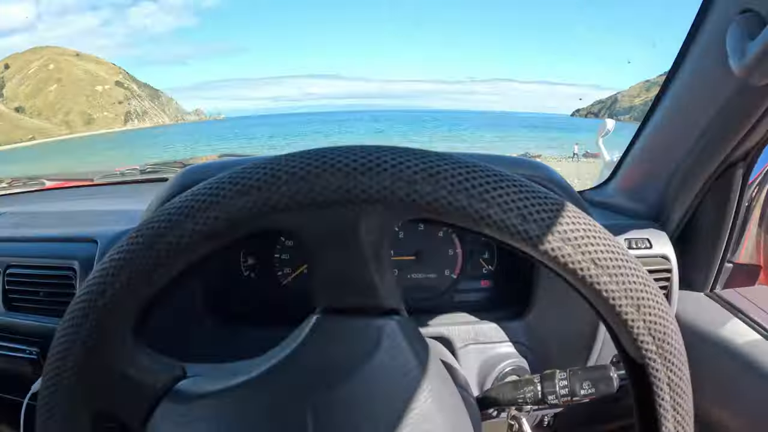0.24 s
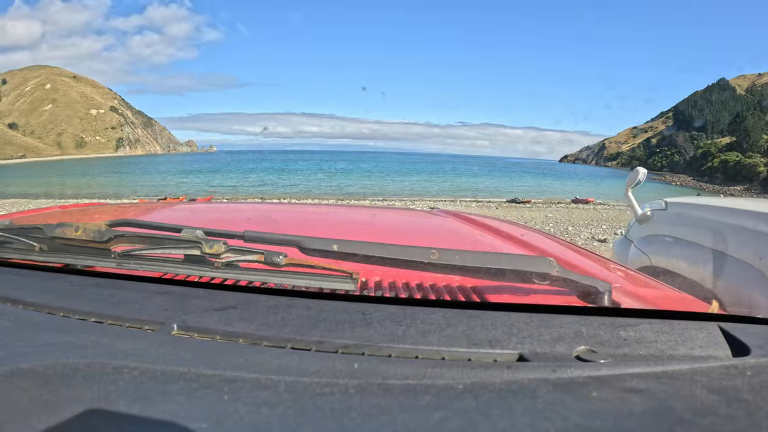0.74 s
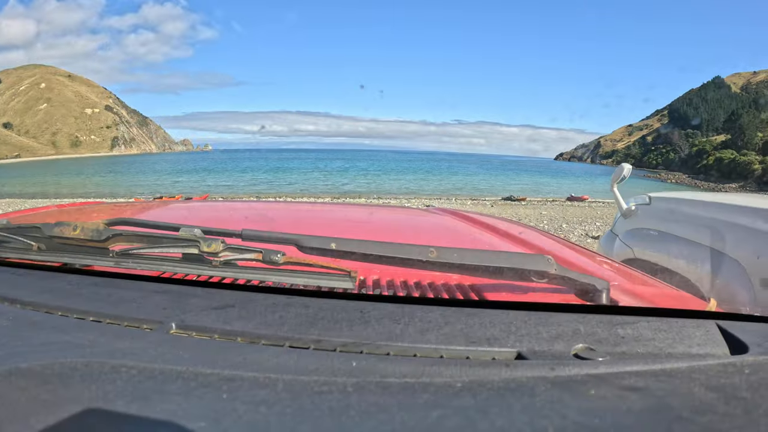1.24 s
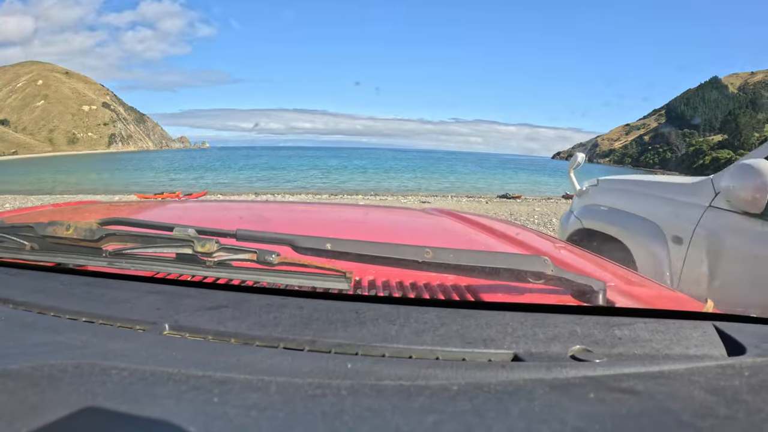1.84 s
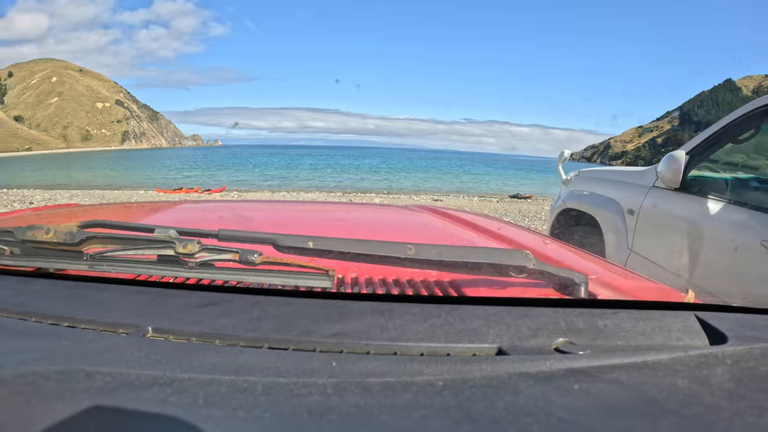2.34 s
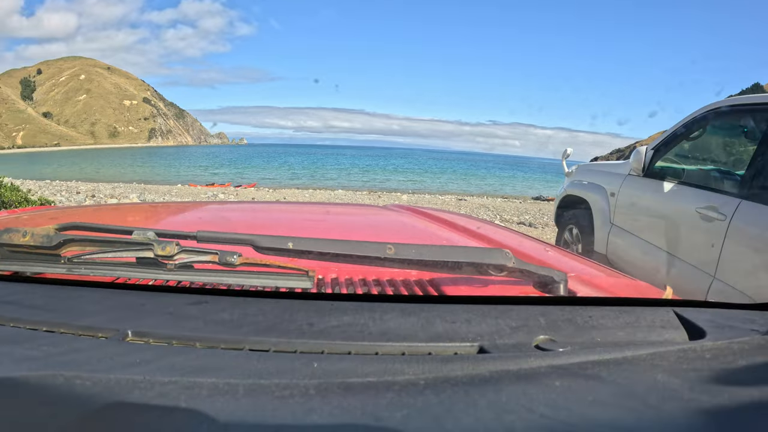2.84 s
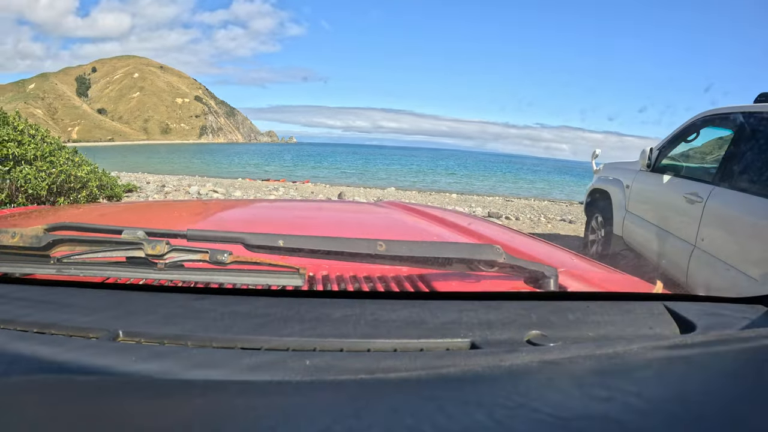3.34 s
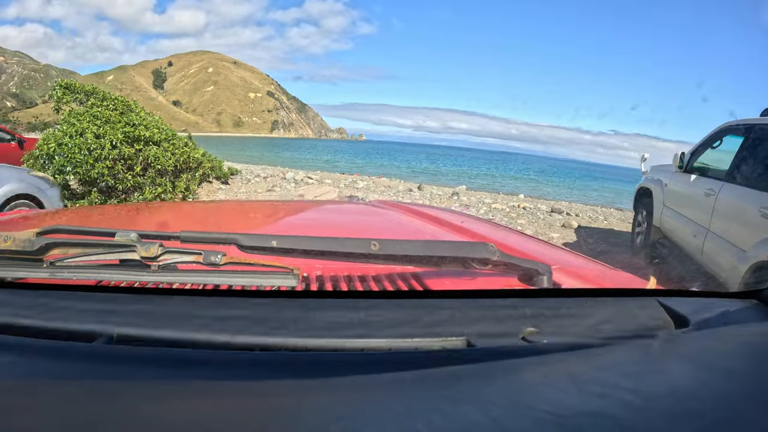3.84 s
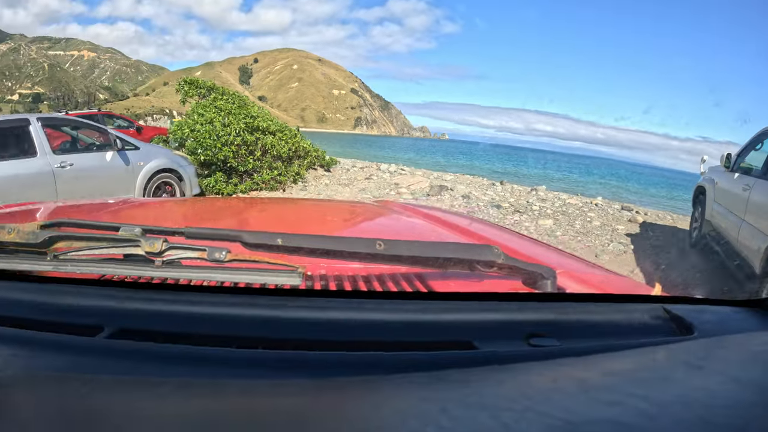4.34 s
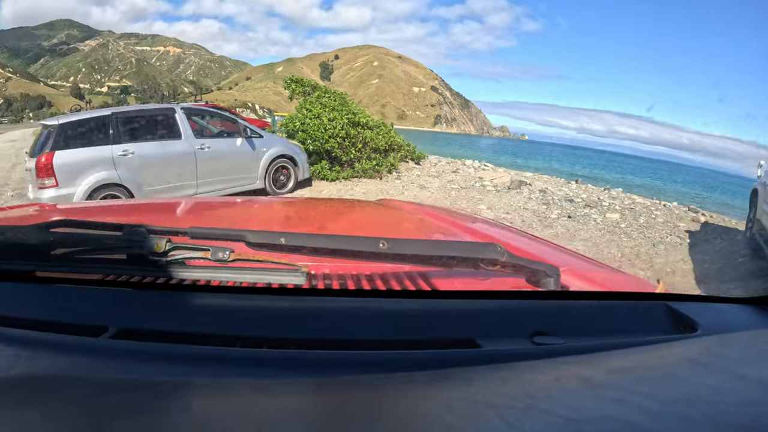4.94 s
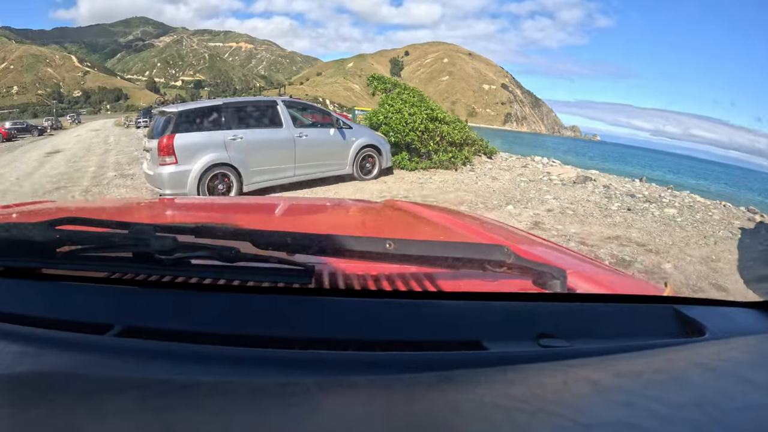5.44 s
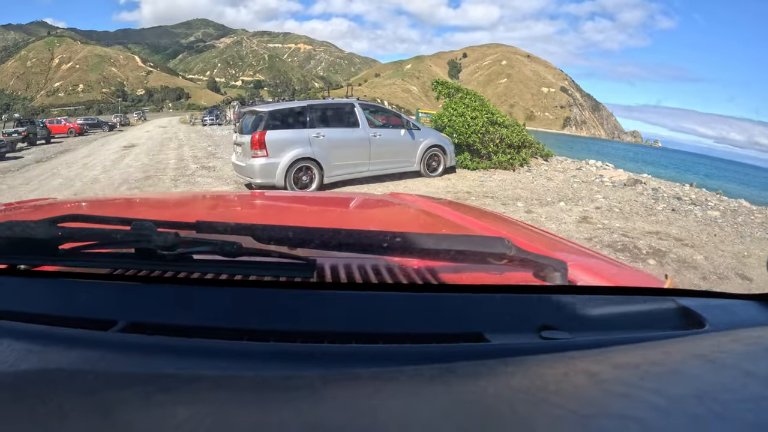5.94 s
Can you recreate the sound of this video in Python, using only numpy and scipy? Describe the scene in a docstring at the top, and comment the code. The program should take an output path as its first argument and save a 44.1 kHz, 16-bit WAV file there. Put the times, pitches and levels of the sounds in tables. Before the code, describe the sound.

Steady diesel idling heard in the cabin, then two quick hard plastic knocks as the microphone settles on the dashboard. From there the engine is heard through the panel, humming and rattling evenly. Tyres roll slowly over stones with soft thumps and crunches, hands slide over a textured steering wheel, plastic creaks briefly, and irregular trim knocks and small metallic clicks grow denser late on.

```python
"""A diesel idle booms in the cabin air of a four-wheel drive, then a few knocks as a camera meets the dashboard.
From there the panel carries hum and clatter, while the car backs slowly out over a stony beach car park.
Engine sounds are cosines and noise bursts locked to the firings; tyres are shaped noise and stone grains.
Palms are shaped noise on the wheel; trim, camera and keys are struck modes; squeaks are fuzzy glides."""
import sys
import numpy as np
from scipy import signal
from scipy.fft import rfft, irfft
from scipy.io import wavfile
from scipy.ndimage import uniform_filter1d

SR = 44100
rng = np.random.default_rng(int(sys.argv[2]) if len(sys.argv) > 2 else 0)


def generate_wav(signal):
    """Clip the signal to [-1, 1] and save it as 16-bit WAV at the path in sys.argv[1]."""
    frames = np.transpose(np.atleast_2d(signal))
    scaled = np.clip(frames, -1, 1) * 32767
    pcm = np.round(scaled).astype(np.int16)
    wavfile.write(sys.argv[1], SR, pcm)


N = 273420
TIME = np.arange(N) / SR
CONTACT_S = 0.672  # camera meets dashboard
EDGE_HZ = 15800  # upper band limit


def gain_of(db):
    """Decibels to amplitude factor."""
    return 10 ** (np.asarray(db) / 20)


def evened(x):
    """Scales to rms 1."""
    return x / np.sqrt(np.mean(x ** 2) + 1e-20)


def curve(rows):
    """Value column of a (time, value) table, joined by straight lines over the whole time."""
    rows = np.array(rows)
    return np.interp(TIME, rows[:, 0], rows[:, 1])


def coloured(x, spectrum):
    """Filters x by a gain curve, linear in dB over log frequency; rms 1."""
    hz, db = np.transpose(spectrum)
    f_hz = np.fft.rfftfreq(len(x), 1 / SR)
    gain = gain_of(np.interp(np.log(f_hz + 1), np.log(hz), db))
    return evened(irfft(rfft(x) * gain, len(x)))


def band(x, low_hz, high_hz):
    """Causal band-pass."""
    sos = signal.butter(4, [low_hz, high_hz], "band", fs=SR, output="sos")
    return signal.sosfilt(sos, x)


def wander(rate_hz):
    """Slow noise of rms 1, its spectrum falling as a Gaussian of scale rate_hz."""
    f_hz = np.fft.rfftfreq(N, 1 / SR)
    spectrum = rfft(rng.standard_normal(N)) * np.exp(-(f_hz / rate_hz) ** 2)
    return evened(irfft(spectrum, N))


def add(mix, start_s, sound):
    """Mixes a sound in at start_s."""
    part = mix[max(round(start_s * SR), 0):][:len(sound)]
    part += sound[:len(part)]


def strike(sound, window_samples=176):
    """Scales a hit so that its loudest window (4 ms by default) has rms 1."""
    return sound / np.sqrt(uniform_filter1d(sound ** 2, window_samples).max())


def ring(modes, t, spread):
    """Decaying sine modes, one a row, with random signs and random detuning by spread."""
    hz, db, t60_s = np.transpose(modes)[:, :, None]
    detune, sign = rng.standard_normal((2, len(modes), 1))
    decay = gain_of(db - 60 * t / t60_s)
    return np.sign(sign) * decay * np.sin(2 * np.pi * hz * (1 + spread * detune) * t)


def bursts(turns, decay_turns, scatter_db, steady):
    """Noise that flares at every whole turn and decays, each flare of its own size, over a steady part."""
    size = gain_of(scatter_db * rng.standard_normal(N))[np.floor(turns).astype(int)]
    flare = size * np.exp(-(turns % 1) / decay_turns)
    return (steady + flare) * rng.standard_normal(N)


# engine speed: time_s, speed_rpm
SPEED_RPM = [(0, 756), (0.9, 760), (1.25, 746), (3.3, 750), (4.4, 755), (4.95, 761), (5.28, 794),
             (5.65, 752), (6.2, 762)]


def firings():
    """Running count of firings: four cylinders fire twice a revolution."""
    firing_hz = 2 * curve(SPEED_RPM) / 60
    return np.cumsum(firing_hz) / SR


# idle boom in the cabin air: firing_rate_multiple, relative_level_db
AIR_ORDERS = [(1, 2.5), (2, -14.5), (3, -11.5), (4, -16), (5, -18), (6, -21), (7, -26), (8, -42), (9, -22),
              (11, -29.5), (14, -41)]
# wash in the cabin air: frequency_hz, relative_level_db
WASH_SPECTRUM = [(20, -32), (60, 6), (200, 2), (350, -9), (600, -17.5), (1200, -24), (2500, -32),
                 (4500, -37.5), (9000, -47.5), (15000, -61)]
# tick at each firing: frequency_hz, relative_level_db
TICK_SPECTRUM = [(1500, -31), (3500, -1), (4400, 4), (5500, -11), (6400, 3), (7400, -7), (9000, -3),
                 (11000, -22), (15000, -24)]


def cabin_air(turns, wash_db=-41.5, tick_db=-71.5):
    """Air-borne idle: a boom of firing orders, a soft noise wash and a fine tick at each firing."""
    boom = np.zeros(N)
    for k, db in AIR_ORDERS:
        boom += gain_of(db) * np.cos(2 * np.pi * (round(k) * turns + rng.random()))
    boom_db = np.interp(TIME, [0, CONTACT_S], [-30.5, -26])  # louder towards the windscreen
    wash = coloured(rng.standard_normal(N), WASH_SPECTRUM)
    ticks = coloured(bursts(turns + .4, decay_turns=.17, scatter_db=1.5, steady=.05), TICK_SPECTRUM)
    return gain_of(boom_db) * evened(boom) + gain_of(wash_db) * wash + gain_of(tick_db) * ticks


# blows on the trim, some by the camera: start_s, level_db (loudest 6 ms), centre_hz
KNOCKS = [(0.075, -42, 710), (0.711, -34.5, 505), (0.743, -34, 670), (1.52, -30, 640), (1.627, -32, 650),
          (1.687, -41, 527), (2.132, -45, 613), (3.356, -36.5, 1270), (3.911, -30.5, 1050),
          (4.126, -41.5, 950), (4.279, -35, 640), (4.651, -40, 750), (5.402, -31, 760), (5.514, -39, 596),
          (5.637, -30.5, 780), (5.913, -37.5, 990)]
# trim modes: frequency_hz, relative_level_db, t60_s
TRIM_MODES = [(290, -16.5, .12), (365, 8, 0.25), (476, 3, 0.12), (580, 5.5, 0.1), (710, -6.5, 0.098),
              (837, -5.5, 0.11), (1085, 1.5, 0.056), (1420, -0.5, 0.057), (1475, 0, .09), (1770, -2, 0.047),
              (2240, -7.5, 0.21)]


def knocks(crack_db=-6, crack_t60_s=0.04, rise_s=.0007):
    """Blows on the trim: each wakes the modes near its own centre and adds a short noise crack."""
    out, t = np.zeros(N), np.arange(SR // 5) / SR
    rise = 1 - np.exp(-t / rise_s)
    for start_s, db, centre_hz in KNOCKS:
        octaves = np.log2(np.array(TRIM_MODES)[:, 0] / centre_hz)
        body = strike(gain_of(-12 * octaves ** 2) @ ring(TRIM_MODES, t, spread=.025))
        crack = band(rng.standard_normal(len(t)), .65 * centre_hz, 1.4 * centre_hz + 900)
        crack = strike(crack * gain_of(-60 * t / crack_t60_s))
        knock = rise * (body + gain_of(crack_db) * crack)
        add(out, start_s, gain_of(db) * strike(knock, window_samples=264))
    return out


# camera housing on panel: start_s, ring_level_db (loudest 4 ms)
TAPS = [(0.669, -46.5), (0.677, -47), (0.701, -57), (0.709, -49)]
# housing modes: frequency_hz, relative_level_db, t60_s
HOUSING_MODES = [(2275, 5, 0.12), (2480, -4, 0.051), (2730, 5, 0.063), (3270, -1, 0.11), (3670, -4.5, 0.28),
                 (4670, -3, 0.071), (5860, -0.5, 0.068), (6460, 0.5, 0.055), (7400, -10, .03),
                 (8760, -23, 0.027)]


def camera_taps(scrape_t60_s=.05):
    """The hard housing bounces on the panel as it settles: ringing modes and a short noise scrape."""
    out, t = np.zeros(N), np.arange(SR // 6) / SR
    for start_s, db in TAPS:
        scrape = band(rng.standard_normal(len(t)), 2000, 12000) * gain_of(-60 * t / scrape_t60_s)
        tone = strike(ring(HOUSING_MODES, t, spread=0.017).sum(0))
        add(out, start_s, gain_of(db) * (tone + .5 * strike(scrape)))
    return out


# rolling speed: time_s, share_of_top_speed
ROLL = [(1.15, 0.23), (1.5, 0.49), (2.1, 0.39), (2.8, 0.98), (3.3, 1), (3.6, 0.64), (4.6, .87), (5.4, 0.47),
        (6.2, 0.32)]


def rolling():
    """Share of the top speed at every moment."""
    return np.maximum(curve(ROLL), .01)


DRIVE_S, TAKE_UP_S = 1.1, 0.8  # start and duration of the engine's loading
# main engine orders in the panel:
# firing_rate_multiple, free_level_db, loaded_level_db, wavering_db (rms, at top speed)
MAIN_ORDERS = [(2, -22.7, -24.5, 1.3), (4, -23, -20, 1.06), (8, -33, -37.5, 3.5)]
# higher orders in the panel: firing_rate_multiple, level_db (before the rolling loss)
DASH_ORDERS = [(6, -38), (10, -44.5), (12, -48), (14, -49), (16, -56.5), (18, -48.5), (20, -48), (22, -48),
               (26, -57), (28, -61), (40, -57.5), (42, -55.5)]


def dash_hum(turns, shake_db=3, shaken_loss_db=4.5, odd_db=-47, odd_slope_db=1.33):
    """Engine orders through the panel: load shifts the main ones; rolling makes main and higher ones waver."""
    def wave(k):
        smear_rad = .27 * k * (k - 4)  # the panel smears each firing in time
        return np.cos(2 * np.pi * k * turns + smear_rad)
    load = np.clip((TIME - DRIVE_S) / TAKE_UP_S, 0, 1)
    speed, hum = rolling(), np.zeros(N)
    for k, free_db, loaded_db, waver_db in MAIN_ORDERS:
        level_db = free_db + load * (loaded_db - free_db)
        hum += gain_of(level_db + waver_db * speed * wander(5.1)) * wave(round(k))
    jolt = np.sqrt(speed)
    for k, db in DASH_ORDERS:
        hum += gain_of(db + jolt * (shake_db * wander(3.0) - shaken_loss_db)) * wave(round(k))
    for k in range(3, 24, 2):  # faint odd orders
        hum += gain_of(odd_db - odd_slope_db * k) * wave(k)
    return np.sqrt(2) * hum  # levels are rms


# diesel knock in the panel: frequency_hz, relative_level_db
CLATTER_SPECTRUM = [(120, -22), (220, 1.5), (340, 5), (540, -0.5), (680, -7.5), (880, -9), (1060, -9),
                    (1300, -17), (2200, -33), (2800, -30.5), (3300, -32), (4700, -43), (7000, -44.5),
                    (15000, -54.5)]


def clatter(turns, level_db=-41.0, waver_db=0.28):
    """Diesel knock: two noise bursts a firing, with the panel buzzing at twice that rate."""
    knock = bursts(2 * turns + 0.33, decay_turns=0.12, scatter_db=-0.5, steady=0.78)
    buzz = bursts(4 * turns + .5, decay_turns=0.29, scatter_db=0.5, steady=0.054)
    level = gain_of(level_db + waver_db * wander(17))
    return level * coloured(knock + 0.87 * buzz, CLATTER_SPECTRUM)


def through_trim(x, ring_db):
    """Sound that crosses the trim sets its modes ringing."""
    modes = ring(TRIM_MODES, np.arange(SR // 8) / SR, spread=0).sum(0)
    ringing = signal.oaconvolve(x, modes)[:N]
    return evened(x) + gain_of(ring_db) * evened(ringing)


# tyre spectra: frequency_hz, relative_level_db
RUMBLE_SPECTRUM = [(15, -21.5), (30, -0.5), (45, 1.5), (70, -0.5), (110, 3.5), (170, -5), (260, -13.5),
                   (400, -29), (800, -28), (2000, -81)]
GRAVEL_SPECTRUM = [(300, -12.5), (750, 0), (1200, 5.5), (1500, 2.5), (1900, -3), (2250, -3.5),
                   (2700, -14.5), (3200, -16.5), (3700, -17.5), (4700, -21), (8000, -27), (15000, -46.5)]
# a wheel rides over a larger stone: centre_s, thump_db, crunch_db
BUMPS = [(1.57, -27, -51.5), (1.91, -27.5, -59), (2.79, -27, -63), (3.49, -26, -62), (3.87, -25, -61),
         (4.14, -26, -68), (4.52, -26.5, -52), (5.2, -19.5, -45), (5.94, -31.5, -49)]
BUMP_SIGMA_S = 0.042
# level at top speed; amplitude grows as speed to the power
RUMBLE_DB, RUMBLE_POWER = -30, 0.38
GRAVEL_DB, GRAVEL_POWER = -47.5, 0.95


def tyres(stones_per_s=900, size_db=3, stone_decay_s=0.008, lumpy_db=1.5):
    """Lumpy rumble through the springs and crunching stones; both grow with speed and swell at a bump."""
    thump = gain_of(RUMBLE_DB) * rolling() ** RUMBLE_POWER
    crunch = gain_of(GRAVEL_DB) * rolling() ** GRAVEL_POWER
    for centre_s, thump_db, crunch_db in BUMPS:
        swell = np.exp(-.5 * ((TIME - centre_s) / BUMP_SIGMA_S) ** 2)
        thump = np.hypot(thump, gain_of(thump_db) * swell)
        crunch = np.hypot(crunch, gain_of(crunch_db) * swell)
    lumps = gain_of(lumpy_db * wander(12))
    rumble = thump * lumps * coloured(rng.standard_normal(N), RUMBLE_SPECTRUM)
    sizes = gain_of(size_db * np.minimum(rng.exponential(1, N), 4))
    stones = (rng.random(N) < stones_per_s / SR) * sizes
    decay = np.exp(-np.arange(900) / SR / stone_decay_s)
    grains = signal.oaconvolve(stones, decay)[:N] * rng.standard_normal(N)
    return rumble + crunch * coloured(through_trim(grains, ring_db=-12.0), GRAVEL_SPECTRUM)


# palm on the wheel cover: frequency_hz, relative_level_db
SLIDE_SPECTRUM = [(1000, -15), (3200, 7.5), (3900, 3), (4750, 7.5), (5300, 1), (5900, 4), (7000, 1),
                  (8500, -3.5), (10000, -3), (13000, -11), (15500, -11.5)]
# quick palm strokes along the rim: start_s, length_s, level_db (before the swell), centre_hz
STROKES = [(1.329, .22, -65.5, 6000), (1.61, 0.04, -60.5, 6900), (1.832, 0.083, -61, 7500),
           (2.148, 0.089, -63, 7260), (2.252, 0.31, -61, 9400), (3.293, 0.032, -59.5, 9500),
           (4.25, 0.065, -58, 4450), (4.4, 0.064, -61, 6000), (5.145, 0.043, -56.5, 5400),
           (5.688, 0.17, -60, 6940)]
SCUFF_DB, STEER_DB = -67, -63.5  # hands resting on the wheel, turning it
STEER_S, STEER_RISE_S, STEER_EASE_DB_PER_S = 1.25, 0.19, 1.8
STROKE_SWELL_POWER, STROKE_GRAIN_DB = 0.49, 3.5  # fade shape; skin catching on the cover


def hands(width_octaves=0.79, uneven_db=1.93):
    """Palms hiss over the grained wheel cover: uneven shaped noise, plus short band-limited strokes."""
    since_s = TIME - STEER_S
    steering = np.clip(since_s / STEER_RISE_S, 0, 1) * gain_of(STEER_DB - STEER_EASE_DB_PER_S * since_s)
    grip = np.hypot(gain_of(SCUFF_DB), steering) * gain_of(uneven_db * wander(40))
    out = grip * coloured(rng.standard_normal(N), SLIDE_SPECTRUM)
    for start_s, length_s, db, centre_hz in STROKES:
        n = int(length_s * SR)
        noise = rng.standard_normal(SR // 2)[:n]
        octaves = np.log2((np.fft.rfftfreq(n, 1 / SR) + 1) / centre_hz)
        rub = evened(irfft(rfft(noise) * np.exp(-.5 * (octaves / width_octaves) ** 2), n))
        grain = evened(uniform_filter1d(rng.standard_normal(SR // 2), size=180))[:n]
        catching = gain_of(STROKE_GRAIN_DB * grain)
        swell = np.sin(np.pi * np.arange(n) / n) ** STROKE_SWELL_POWER
        add(out, start_s, gain_of(db) * evened(rub * catching) * swell)
    return out


# plastic on plastic: start_s, length_s, start_hz, end_hz, width_hz, level_db (before the swell)
SQUEAKS = [(1.208, 0.062, 3360, 3100, 140, -53.5), (1.221, 0.02, 5750, 6000, 400, -60.5),
           (1.335, 0.094, 1840, 1730, 450, -45.5), (1.338, 0.072, 5670, 5650, 450, -59.5),
           (3.646, 0.03, 9040, 9200, 150, -69), (4.914, 0.027, 5640, 5800, 400, -46.5),
           (5.037, 0.023, 5850, 5750, 403, -50.5), (5.119, 0.043, 5700, 5300, 405, -57),
           (5.442, 0.023, 14900, 14700, 700, -61)]


def squeaks(octave_db=-17):
    """Stick and slip of plastic: a fuzzy gliding tone, with a faint octave if below EDGE_HZ."""
    out = np.zeros(N)
    for start_s, length_s, start_hz, end_hz, width_hz, db in SQUEAKS:
        n = int(length_s * SR)
        noise = rng.standard_normal((SR // 4, 2))[:n] @ [1, 1j]
        fuzz = signal.sosfilt(signal.butter(2, width_hz / 2, fs=SR, output="sos"), noise)
        glide = np.exp(2j * np.pi * np.cumsum(np.linspace(start_hz, end_hz, n)) / SR)
        octave = gain_of(octave_db) * (2 * start_hz < EDGE_HZ) * glide ** 2
        tone = evened((fuzz * (glide + octave)).real)
        add(out, start_s, gain_of(db) * tone * np.sin(np.pi * np.arange(n) / n))
    return out


JIGGLE_FROM_S, JIGGLES_PER_S = 1.9, 5.5
JIGGLE_DB, JIGGLE_RING_DB, JIGGLE_BRIGHT_DB = -49.5, -9, -5


def jiggles():
    """Faint clicks at random intervals while the car rocks, as rows like those of CLICKS."""
    times_s = JIGGLE_FROM_S + np.cumsum(rng.uniform(.2, 1.8, size=40)) / JIGGLES_PER_S
    return [(start_s, JIGGLE_DB, JIGGLE_RING_DB, JIGGLE_BRIGHT_DB) for start_s in times_s]


# louder clicks of key ring and fittings: start_s, peak_db, relative_ring_db, relative_bright_snap_db
CLICKS = [(2.3296, -50, -5, -14), (2.6495, -44.5, 2, -25), (4.022, -44, -9, -17), (4.276, -36, -18, -15),
          (4.328, -43, 1, -17), (4.409, -45, -9, 5), (4.4345, -36, 7, -14), (4.4757, -42, -14, -5),
          (4.5037, -40.5, -4, -22), (4.5236, -41, -11, -13), (4.595, -41, -28, -2), (4.8524, -39.5, -21, 3),
          (4.9652, -38.5, -6, -7), (5.4, -39, -16, -12), (5.433, -43, -1, -5), (5.567, -40, -9, -12),
          (5.632, -40, -33, 5), (5.733, -32.5, -2, -6), (5.7457, -36, -4, -21), (5.8227, -41, -1, -15),
          (5.9052, -40.5, -16, -1), (5.942, -32.5, -46, -6), (5.9833, -37.5, -35, -18),
          (6.0884, -32, -3, -9)]
# key modes: frequency_hz, relative_level_db, t60_s
KEY_MODES = [(3207, -6.5, 0.064), (4190, -1, 0.042), (4644, 2, 0.017), (4770, 3.5, 0.045),
             (5090, -0.5, 0.027), (6260, -11, 0.025), (6400, -14.5, 0.017)]


def clicks(snap_t60_s=0.017, cabin_t60_s=.12, cabin_db=-22, bounce_db=-13, rise_s=.002):
    """Keys and fittings tap and bounce once: a dry snap, a short ring, and a trace of the cabin."""
    out, t = np.zeros(N), np.arange(SR // 8) / SR
    rise = 1 - np.exp(-t / rise_s)
    cabin = gain_of(cabin_db) * gain_of(-60 * t / cabin_t60_s)
    fade = rise * (gain_of(-60 * t / snap_t60_s) + cabin)
    for start_s, db, ring_db, bright_db in CLICKS + jiggles():
        low, high = rng.standard_normal((2, len(t))) * fade
        tone = gain_of(ring_db) * strike(rise * ring(KEY_MODES, t, spread=.04).sum(0))
        dull_snap = strike(band(low, 2400, 7220))
        bright_snap = gain_of(bright_db) * strike(band(high, 6700, 14500))
        tap = tone + .5 * dull_snap + .5 * bright_snap
        tap = gain_of(db) * tap / np.abs(tap).max()
        add(out, start_s, tap)
        add(out, start_s + rng.uniform(.006, .025), gain_of(bounce_db) * tap)
    return out


def scene():
    """Air-borne idle first; once the camera rests on the dashboard, the body's sound takes over."""
    turns = firings()
    resting = np.clip((TIME - CONTACT_S) / 0.0073 + .5, 0, 1)  # 7.3 ms crossfade
    air = cabin_air(turns)
    body = dash_hum(turns) + clatter(turns) + tyres() + hands()
    hits = knocks() + camera_taps() + clicks() + squeaks()
    return ((1 - resting) * air + resting * body + hits)[None]


def record(dry):
    """Linear-phase low-pass at EDGE_HZ."""
    lowpass = signal.firwin(511, EDGE_HZ, window=("kaiser", 9), fs=SR)
    return signal.oaconvolve(dry, lowpass[None], "same")


dry = scene()
out = record(dry)
generate_wav(out)
```